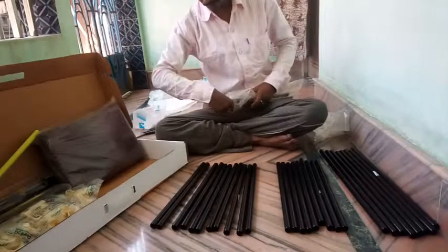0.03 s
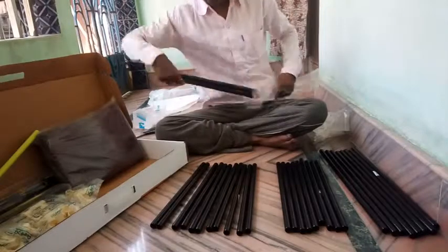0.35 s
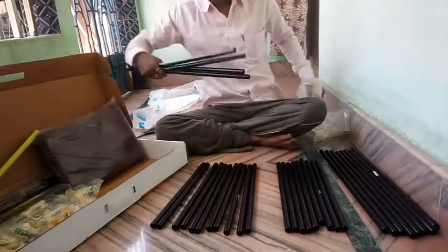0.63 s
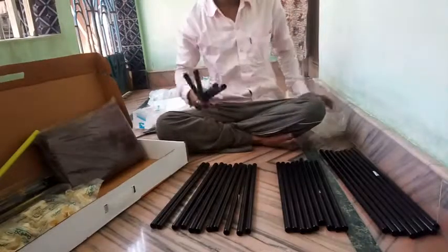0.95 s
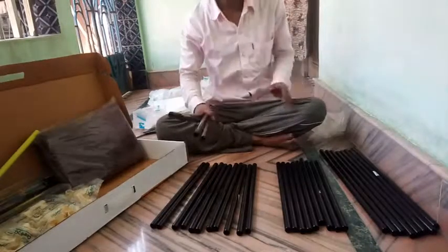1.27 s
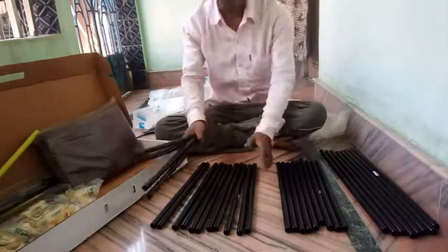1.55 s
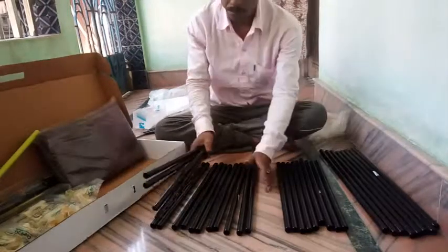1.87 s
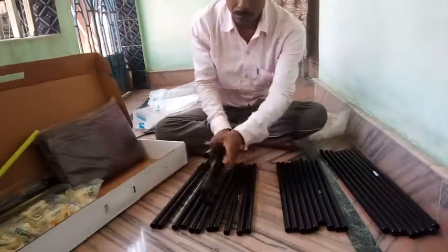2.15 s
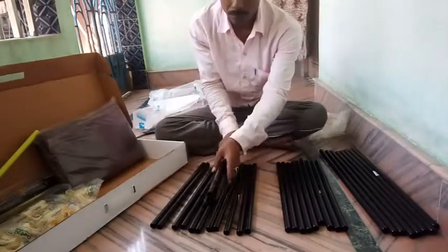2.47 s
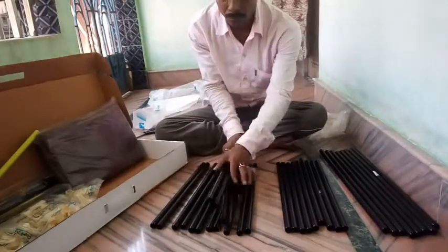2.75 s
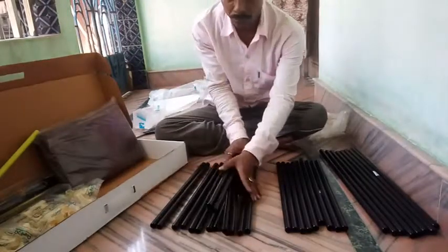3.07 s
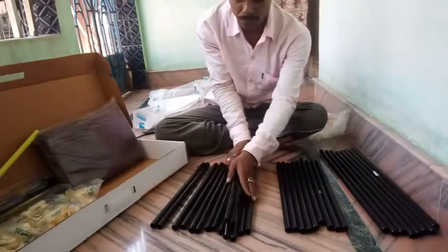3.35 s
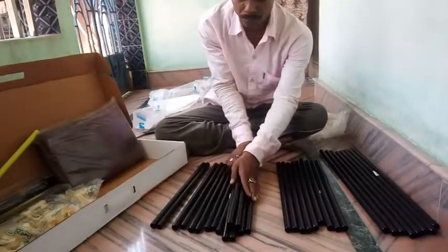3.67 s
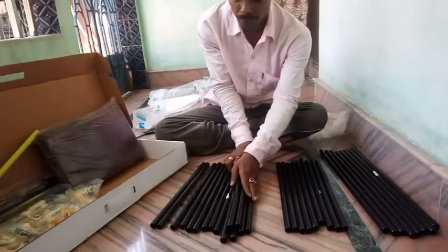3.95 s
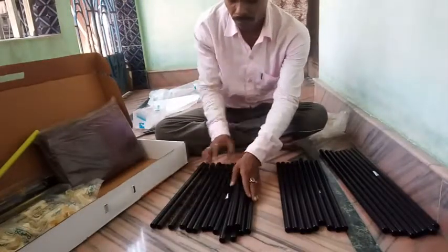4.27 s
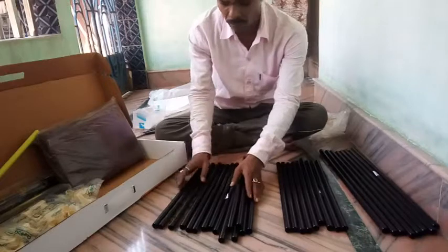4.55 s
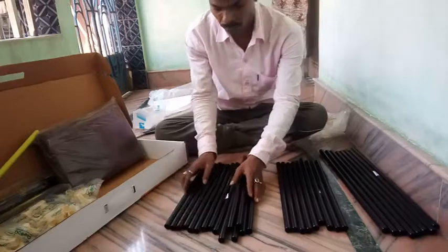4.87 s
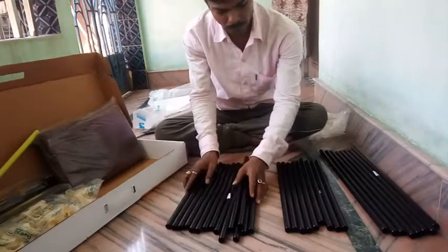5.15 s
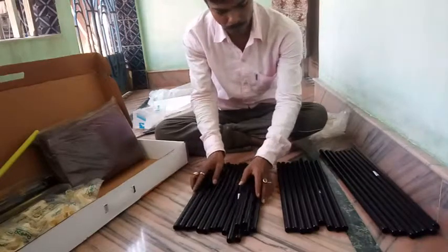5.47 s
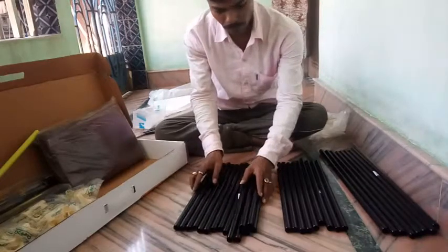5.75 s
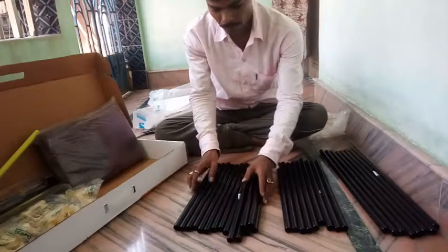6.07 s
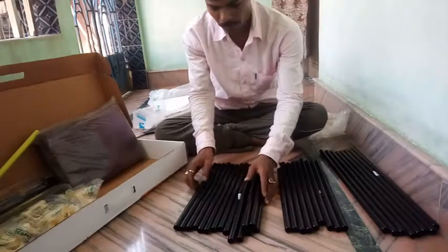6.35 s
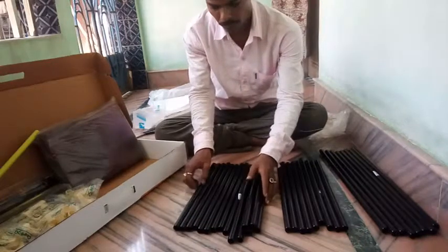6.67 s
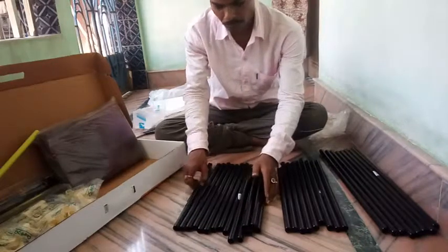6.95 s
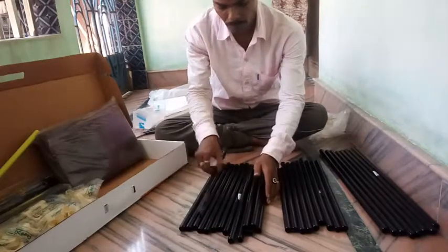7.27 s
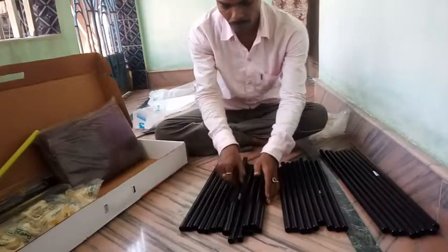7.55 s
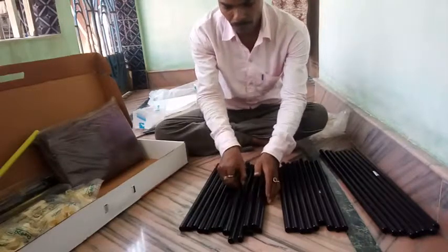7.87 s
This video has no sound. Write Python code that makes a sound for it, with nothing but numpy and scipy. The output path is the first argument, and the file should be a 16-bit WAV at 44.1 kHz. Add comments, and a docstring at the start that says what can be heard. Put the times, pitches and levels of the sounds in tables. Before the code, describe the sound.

For the first second, thin plastic wrapping crinkles and snaps softly, with a light clack of steel tubes at about 0.2 seconds and two faint ticks after it. Between 1.2 and 1.8 seconds come a faint brush against cloth and two very faint squeaks of tubes rubbing. At 2.3 seconds the tubes land on others on a tiled floor with a clink. From about 3 to 4 seconds they clack and rattle in a quick cluster, loudest near 3.5 and 3.9, each hit ringing briefly and brightly, with short gritty rolls between. More clinks follow around 4.5 to 4.7, then another loud, chattering cluster from 5.2 to 5.8. After that come light taps and a faint rustle, a clear clink at 7.4 and smaller ones near 7.6 and 7.9. The small room adds short echoes, and a soft hiss and low rumble continue throughout.

```python
"""Laying steel tubes on a tiled floor

Steel tubes are pulled out of plastic wrapping and laid in a row in a small room. Each knock is a hard
contact with a short chatter: the pile clacks, and single tubes ring briefly as they bend to and fro.
In between, tubes roll on the tiles or squeak faintly in the hand, and the plastic crinkles.
A low room rumble and a soft hiss lie underneath. The bass dips for a moment after loud clinks."""
import sys
import numpy as np
from scipy import signal
from scipy.fft import rfft, irfft, next_fast_len
from scipy.io import wavfile
from scipy.ndimage import uniform_filter1d

SR = 44100
rng = np.random.default_rng(int(sys.argv[2]) if len(sys.argv) > 2 else 0)


def inscribe(sig):
    """Save sig as 16-bit PCM at rate SR to the path in sys.argv[1].

    A 1-D sig is mono; a 2-D sig holds one channel per row.
    Samples are clipped to [-1, 1] before scaling.
    """
    pcm = np.round(np.clip(np.atleast_2d(sig).T, -1, 1) * 32767)
    wavfile.write(sys.argv[1], SR, pcm.astype(np.int16))


N = 349272
TAIL = SR // 3   # samples that one knock, snap or squeak may last
REBOUND_S = 0.018   # average time between a tube's bounces

# A tube hits the others or the tiles. Each row: start in seconds, clack level in dB, clack brightening
# in dB per octave, rattle time in seconds, low, middle and high ring levels in dB, middle pitch in Hz.
KNOCKS = [(0.157, -38, 2.5, .008, -68, -56, -72, 3430), (0.548, -50.5, 6, 0.018, -78, -70, -65, 3660),
          (0.615, -49, 7, .006, -80, -74, -77, 3600), (2.32, -36.5, 7, 0.01, -52, -46.5, -51, 3310),
          (2.944, -37, 12, .008, -60, -48, -55, 3640), (3.092, -52.5, 1, .008, -73, -66, -70, 3300),
          (3.115, -33.5, 4, .006, -47.5, -53, -47.5, 3590), (3.169, -36.5, 8.5, .005, -50, -57, -70, 3320),
          (3.241, -48, -0.5, 0.017, -57, -55, -74, 3590), (3.415, -46.5, 0.5, 0.02, -76, -46.5, -73, 3577),
          (3.490, -23.5, 3, 0.055, -41.5, -38, -34, 3560), (3.684, -35, 2.5, 0.058, -37.5, -52, -51, 3407),
          (3.915, -42, -5.5, 0.042, -49, -66, -53, 3380), (3.939, -25, 5.5, 0.027, -30.5, -41, -40.5, 3540),
          (4.516, -40, 6.5, 0.11, -51, -39.5, -51.5, 3310),
          (4.659, -32.5, 6.5, 0.03, -59, -31.5, -40.5, 3500),
          (4.734, -29, 4.5, 0.016, -38, -34, -43.5, 3516), (5.23, -38, -3, 0.014, -68, -46, -54, 3500),
          (5.433, -42, -0.5, .04, -49, -57, -54, 3250), (5.506, -24.5, 4.5, 0.027, -31, -48, -41, 3540),
          (5.588, -49, 3, 0.014, -42, -52, -66, 3448), (5.738, -33, 3, 0.019, -37, -32.5, -37, 3375),
          (5.776, -30.5, 1.5, 0.084, -39, -29.5, -31, 3370),
          (6.082, -42.5, -3.5, 0.049, -55, -45, -53.5, 3330), (6.601, -53, 3, 0.018, -72, -62, -64, 3450),
          (6.754, -54.5, 4, 0.0099, -72, -67, -79, 3380), (6.915, -51, 4.5, 0.013, -78, -58.5, -57, 3550),
          (7.408, -33, 2, 0.0095, -52, -35.5, -46, 3388), (7.562, -40, 2, 0.02, -46.5, -48.5, -56, 3370),
          (7.892, -44.5, 4.5, .02, -54, -61, -67, 3391)]
# A tube's natural tones (modes) in four groups: low, middle, high and overtones.
# Each row: pitch in Hz, relative level in dB, seconds to fade by 60 dB.
TUBE_MODES = [
    [(1754, -9, .22), (1785, 0, .31), (1845, -7, .24), (1950, -12, .2), (2055, -12, .2)],
    [(3039, -16, .26), (3143, -12, .28), (3369, 0, .33), (3450, -11, .24), (3620, -15, .22),
     (4206, -16, .3)],
    [(4410, -13, .28), (5328, 0, .38), (5430, -4, .33), (5481, -9, .33), (6300, -7, .26)],
    [(7747, 0, .4), (9690, -18, .28), (10330, -17, .28), (10700, -14, .3), (11024, -14, .3),
     (14350, -16, .26), (14920, -12, .24), (15684, -7, .24)],
]
# The dense, short ringing of the whole pile. Each row: frequency in Hz, relative level in dB.
CLACK_COLOUR = [(100, -33), (480, -12.5), (640, -0.5), (900, -3.5), (1450, 4), (2000, 10.5), (2800, 1),
                (3700, 7.5), (6300, -1), (6900, -11.5), (7600, -8), (9200, -32), (13000, -27),
                (15200, -10.5)]

def knocks(middle_mode_hz=3370, overtones_db=-10.5, uneven_db=2, rough_db=-4, build_s=0.00053):
    """Every knock makes the pile clack and sets all four groups of tube tones ringing."""
    out, t = np.zeros(N), np.arange(TAIL) / SR
    attack = SR // 36   # the opening samples, which set a knock's level
    building = 1 - np.exp(-t / build_s)
    settle_s = (0.14, 0.11, 0.1, 0.085)   # friction stops the higher groups sooner
    for start_s, clack_db, tilt, rattle_s, low_db, middle_db, high_db, middle_hz in KNOCKS:
        hits = rebounds(rattle_s)
        force = room(contact(hits))
        sound = from_db(clack_db) * rms_one(colour(force, CLACK_COLOUR, tilt), size=attack)
        groups_db = (low_db, middle_db, high_db, high_db + overtones_db)
        shifts = (1, middle_hz / middle_mode_hz, 1, 1)   # the tubes differ a little in pitch
        for modes, group_db, shift, stop_s in zip(TUBE_MODES, groups_db, shifts, settle_s):
            settling = np.exp(-(t / stop_s) ** 2)
            settling_after_rattle = np.interp(t - rattle_s, t, settling)
            for hz, mode_db, t60 in modes:
                # shifting contacts make the pitch waver
                phase = 2 * np.pi * hz * shift * t + drift(1 / REBOUND_S, size=TAIL)
                envelope = building * from_db(-60 * t / t60) * settling
                clean = rms_one(np.sin(phase) * repeated(envelope, hits), size=attack)
                # bounces and echoes drive the tone again and roughen it
                rough = rms_one(ring(force, hz * shift, t60 / 2) * settling_after_rattle)
                tone = np.std(clean) * rms_one(rms_one(clean) + from_db(rough_db) * rough)
                sound += from_db(group_db + mode_db + uneven_db * rng.standard_normal()) * tone
        add(out, start_s, sound)
    return out

def rebounds(rattle_s, count=8, jitter=0.346):
    """A tube lands and bounces unevenly, ever weaker. Each hit: delay in seconds, strength."""
    gaps = REBOUND_S * (1 + jitter * rng.uniform(-0.957, 1, count))
    delays = np.append(0, np.cumsum(gaps))
    return list(zip(delays, np.exp(-(delays / rattle_s) ** 2)))

def contact(hits, crack_s=0.0022, chatter_s=0.0063, chatter_db=-12.5):
    """At each hit a tube lands along its length with a crack, then chatters briefly."""
    t = np.arange(TAIL) / SR
    crack = rng.standard_normal(TAIL) * repeated(t * np.exp(-t / crack_s), hits)
    chatter = grains(per_s=700, spread_db=3, size=TAIL)
    chatter *= repeated(np.sqrt(t) * np.exp(-t / chatter_s), hits)
    return rms_one(crack) + from_db(chatter_db) * rms_one(chatter)

# Tubes roll and slide on the tiles. Each row: start in seconds, length in seconds, level in dB.
ROLLS = [(2.275, 0.04, -52.5), (2.4, .14, -57), (3.258, 0.18, -59), (3.474, 0.036, -38),
         (3.82, 0.098, -52.5), (4.43, 0.084, -58), (5.187, .07, -50), (5.246, 0.26, -44)]

def rolling(ring_db=-5, damped_t60=0.25, dull_hz=8500, fade_s=0.031):
    """Rolling tubes tick over grit; the hand damps their tones and the overtones stay silent."""
    t = np.arange(N) / SR
    force = room(grains(per_s=1400, spread_db=2, size=N))
    tones = sum(from_db(db) * rms_one(ring(force, hz, damped_t60))
                for modes in TUBE_MODES[:-1] for hz, db, _ in modes)
    clatter = rms_one(colour(force, CLACK_COLOUR))
    sound = rms_one(clatter + from_db(ring_db) * rms_one(tones))
    moving = sum(from_db(db) * ((t > s) & (t < s + length_s)) for s, length_s, db in ROLLS)
    return keep_band(sound, "low", dull_hz, order=2) * uniform_filter1d(moving, int(fade_s * SR) + 1)

# Wrapping and sleeves rub. Each row: loudest moment in seconds, fading time in seconds, level in dB.
RUSTLES = [(0.01, 0.044, -46.5), (0.17, 0.16, -50), (0.31, 0.073, -46), (0.57, 0.059, -54),
           (0.83, 0.068, -45), (0.94, 0.089, -49.5), (1.62, 0.08, -60.5), (1.73, 0.053, -56),
           (5.1, 0.6, -63.5), (6.3, 0.097, -72), (6.75, 0.3, -58), (7.2, 0.052, -65)]
# Creases in the plastic snap. Each row: start in seconds, level in dB.
SNAPS = [(0.036, -47.5), (0.093, -54), (0.483, -49.5), (0.799, -47.5), (1.729, -56.5)]
# The tone colours of a rustle and a snap. Each row: frequency in Hz, relative level in dB.
RUSTLE_COLOUR = [(88, -43), (150, -13.5), (422, 1.5), (494, -3.5), (689, -2.5), (998, -6), (1690, -4.5),
                 (6390, -8.5), (11000, -68), (14500, -24), (16000, -14)]
SNAP_COLOUR = [(300, -16), (1200, -3), (2500, 10), (6000, -0.5), (9000, -33), (15000, -24)]

def wrapping(snap_s=0.0002):
    """Thin plastic crinkles in a stream of tiny clicks, and now and then a crease snaps."""
    crinkle = room(grains(per_s=1900, spread_db=3.5, size=N))
    out = strokes(RUSTLES) * rms_one(colour(crinkle, RUSTLE_COLOUR))
    for start_s, db in SNAPS:
        snap = rng.standard_normal(TAIL) * np.exp(-np.arange(TAIL) / SR / snap_s)
        add(out, start_s, from_db(db) * rms_one(colour(room(snap), SNAP_COLOUR), size=SR // 60))
    return out

# A brush against the knee. Each row: loudest moment in seconds, fading time in seconds, level in dB.
BRUSH = [(1.255, 0.052, -54)]
# Its dull tone colour. Each row: frequency in Hz, relative level in dB.
BRUSH_COLOUR = [(300, -20), (700, 1), (1000, 4), (1600, -3), (3000, -43)]
# Tubes squeak in the hand. Each row: start in seconds, length in seconds, first pitch in Hz, level in dB.
SQUEAKS = [(1.239, 0.18, 2660, -59), (1.527, 0.21, 2550, -65.5)]

def carrying(sag_hz_per_s=890, waver_hz=73):
    """The bundle brushes the knee, and its tubes rub together in shaky squeaks that sag in pitch."""
    t = np.arange(TAIL) / SR
    out = strokes(BRUSH) * noise(BRUSH_COLOUR)
    for start_s, length_s, hz, db in SQUEAKS:
        pitch = hz - sag_hz_per_s * t + waver_hz * drift(per_s=440, size=TAIL)
        swell = np.sin(np.pi * np.sqrt(np.minimum(t / length_s, 1))) ** 2
        squeak = room(swell * np.sin(2 * np.pi * np.cumsum(pitch) / SR))
        add(out, start_s, from_db(db) * rms_one(squeak, size=SR // 10))
    return out

# The tone colours of room air, rumble and hiss. Each row: frequency in Hz, relative level in dB.
AIR_COLOUR = [(20, -7.5), (50, -5.5), (125, -2), (200, -5), (400, -5), (800, -9.5), (1600, -11),
              (3200, -14.5), (7000, -17.5), (10000, -85)]
RUMBLE_COLOUR = [(20, -25), (42, -17), (60, 4), (72, 3), (83, 9), (100, -2.5), (140, -11), (300, -63)]
HISS_COLOUR = [(2000, -13), (3800, -7), (4800, 5), (6300, 11.5), (6900, 2.5), (7600, -10.5), (8700, -13.5),
               (9600, -36), (14000, -95), (14800, -42), (16000, -1)]
# How the rumble and the hiss rise and fall. Each row: time in seconds, level in dB.
RUMBLE_LEVEL = [(0, -67), (0.95, -64.5), (1.3, -71), (2.9, -64), (4.3, -71), (5.3, -57), (5.55, -66),
                (6.1, -63), (7.3, -68), (7.9, -64.5)]
HISS_LEVEL = [(0, -53.5), (1, -58.5), (1.7, -57), (2.9, -62), (3.8, -60), (4.35, -64), (4.95, -57.5),
              (5.6, -53.5), (7.9, -55)]

def background(air_mean_db=-61, air_waver_db=2.27, rumble_waver_db=3, waver_per_s=8.2):
    """Room air and a low rumble swell and sink unevenly beside a slowly changing hiss."""
    t = np.arange(N) / SR
    air_db = air_mean_db + air_waver_db * drift(waver_per_s)
    rumble_db = np.interp(t, *np.transpose(RUMBLE_LEVEL)) + rumble_waver_db * drift(waver_per_s)
    hiss_db = np.interp(t, *np.transpose(HISS_LEVEL))
    layers = ((AIR_COLOUR, air_db), (RUMBLE_COLOUR, rumble_db), (HISS_COLOUR, hiss_db))
    return sum(from_db(db) * noise(spectrum) for spectrum, db in layers)

def room(x, echo_db=3, first_echo_s=0.002, low_t60=0.29, treble_t60=0.094, treble_hz=7070):
    """The hard floor and close walls add dense echoes; the treble dies first."""
    t = np.arange(TAIL) / SR
    dense = rng.standard_normal(TAIL) * (t > first_echo_s)
    echoes = sum(keep_band(dense, side, treble_hz, order=4) * from_db(-60 * t / t60)
                 for side, t60 in (("low", low_t60), ("high", treble_t60)))
    response = from_db(echo_db) * echoes / np.linalg.norm(echoes)
    response[0] = 1   # the direct sound
    return signal.fftconvolve(x, response)[:len(x)]

def ring(force, hz, t60):
    """One natural tone, pushed by a force; left alone it fades by 60 dB in t60 seconds."""
    decay, angle = from_db(-60 / (t60 * SR)), 2 * np.pi * hz / SR
    return signal.lfilter([1, 0, -1], [1, -2 * decay * np.cos(angle), decay ** 2], force + 1e-18)

def grains(per_s, spread_db, size):
    """Tiny random clicks of uneven strength and sign."""
    strength = from_db(spread_db * np.minimum(rng.exponential(1, size), 4))
    return (rng.random(size) < per_s / SR) * strength * rng.choice([-1, 1], size)

def repeated(envelope, hits):
    """Start a loudness curve again at every hit; the energies add up."""
    power = np.zeros(TAIL)
    for delay_s, strength in hits:
        at = min(round(delay_s * SR), TAIL)
        power[at:] += (strength * envelope[:TAIL - at]) ** 2
    return np.sqrt(power)

def strokes(rows, rise_share=0.61):
    """The loudness curve of rubbing strokes, which swell quickly and fade more slowly."""
    t, power = np.arange(N) / SR, 0
    for peak_s, fade_s, db in rows:
        away = np.maximum((peak_s - t) / (rise_share * fade_s), (t - peak_s) / fade_s)
        power += (from_db(db) * np.exp(-np.minimum(away, 20))) ** 2
    return np.sqrt(power)

def drift(per_s, size=N):
    """A random wander of typical size 1, heading for a new value per_s times a second."""
    knots = rng.standard_normal(int(per_s * size / SR) + 2)
    return rms_one(np.interp(np.arange(size) * per_s / SR, np.arange(len(knots)), knots))

def noise(spectrum):
    """Steady noise with the given tone colour."""
    return rms_one(colour(rng.standard_normal(N), spectrum))

def colour(x, spectrum, tilt=0):
    """Give a sound a tone colour; tilt adds a slope in dB per octave from 1.5 to 6 kHz."""
    size = next_fast_len(len(x) // 2 + 2048, True) * 2
    hz = np.maximum(np.arange(size // 2 + 1) * SR / size, 1)
    points_hz, db = np.transpose(spectrum)
    shape_db = np.interp(np.log(hz), np.log(points_hz), db) + tilt * np.log2(np.clip(hz / 1500, 1, 4))
    # a minimum-phase filter, so nothing sounds ahead of a hit
    cepstrum = irfft(np.log(from_db(shape_db)))[:size // 2]
    cepstrum[1:] *= 2
    return irfft(rfft(x, size) * np.exp(rfft(cepstrum, size)))[:len(x)]

def keep_band(x, side, hz, order):
    """Keep the "low" or "high" side of a frequency; a higher order cuts more steeply."""
    return signal.sosfilt(signal.butter(order, hz, side, fs=SR, output="sos"), x)

def from_db(db):
    """Turn decibels into a gain."""
    return np.exp(np.asarray(db) * (np.log(10) / 20))

def rms_one(x, size=None):
    """Scale a sound so its first size samples (or all) have an average strength (rms) of 1."""
    return x / np.sqrt(np.mean(x[:size] ** 2) + 1e-20)

def add(out, start_s, sound):
    """Mix a sound in at its start time."""
    at = round(start_s * SR)
    out[at:at + len(sound)] += sound[:N - at]

def bass_dip(x, halved_at_db=-25.5, below_hz=1300, lag_s=0.038, window_s=0.044):
    """The bass drops briefly just after the sound gets loud."""
    power = uniform_filter1d(x ** 2, int(window_s * SR) + 1)
    recent_power = np.interp(np.arange(N) - lag_s * SR, np.arange(N), power)
    gain = 1 / (1 + (recent_power / from_db(halved_at_db) ** 2) ** 2)
    bass = signal.sosfiltfilt(signal.butter(4, below_hz, fs=SR, output="sos"), x)
    return x - (1 - gain) * bass

def scene():
    """Mix all sources into one channel; thin tubes give off almost no bass."""
    tubes = keep_band(knocks() + rolling(), "high", hz=480, order=3)
    return (tubes + wrapping() + carrying() + background())[None]

def record(dry):
    """Dip the bass after loud clinks and cut the treble steeply above 16 kHz."""
    treble_cut = signal.ellip(12, 0.1, 90, 16000, fs=SR, output="sos")
    return signal.sosfilt(treble_cut, bass_dip(dry[0]))[None]

dry = scene()
out = record(dry)
inscribe(out)
```